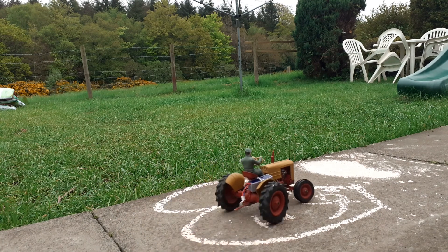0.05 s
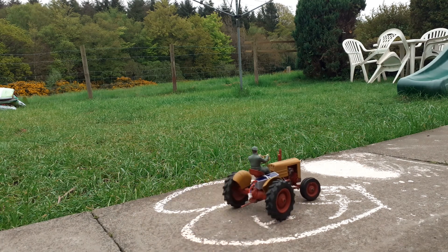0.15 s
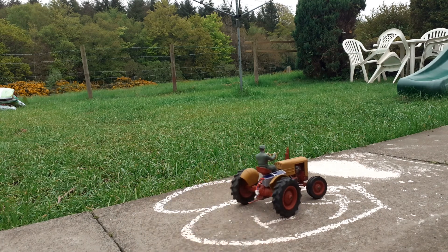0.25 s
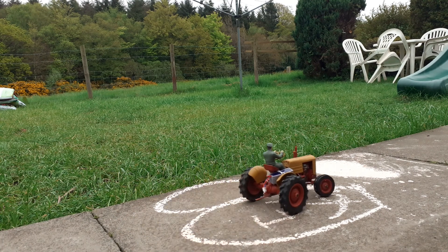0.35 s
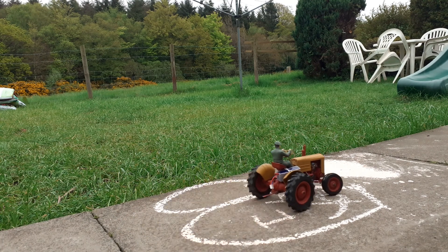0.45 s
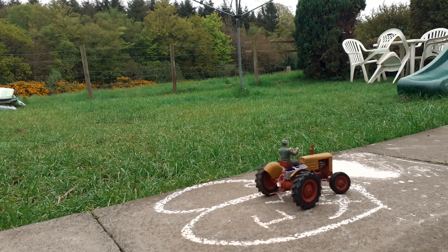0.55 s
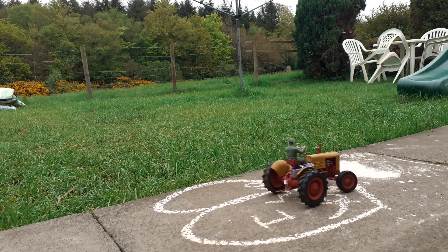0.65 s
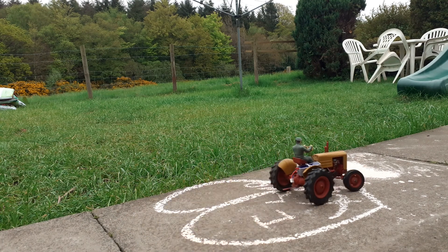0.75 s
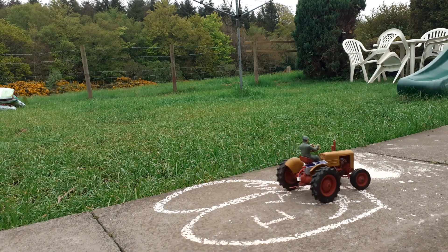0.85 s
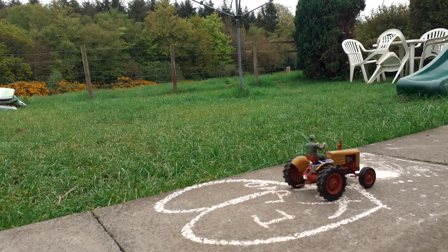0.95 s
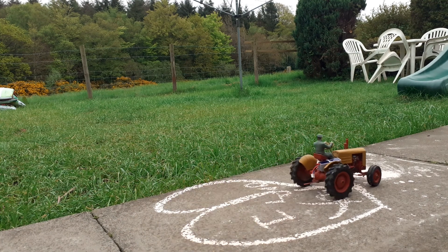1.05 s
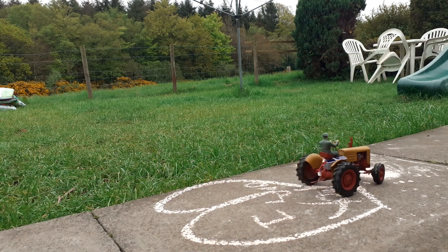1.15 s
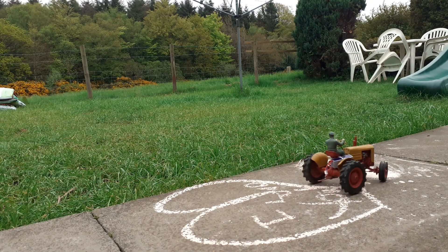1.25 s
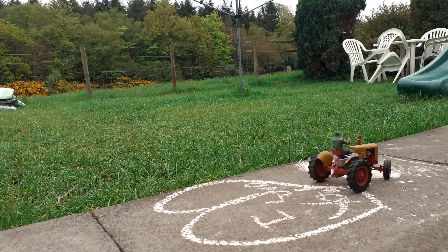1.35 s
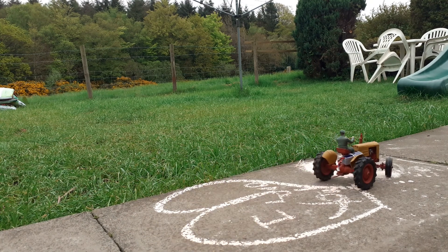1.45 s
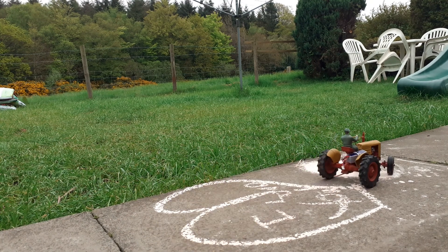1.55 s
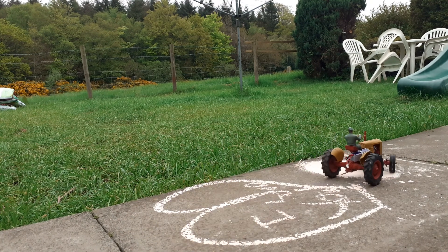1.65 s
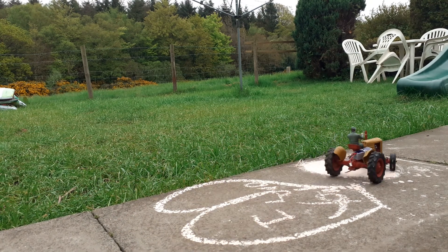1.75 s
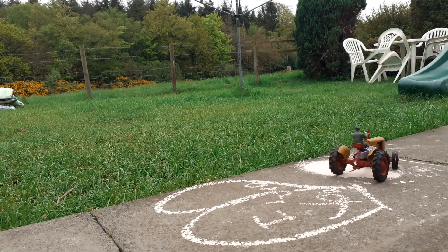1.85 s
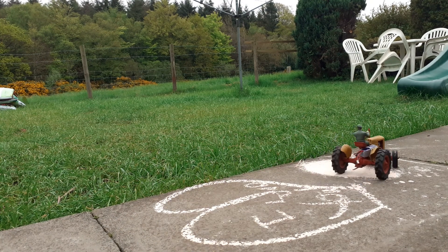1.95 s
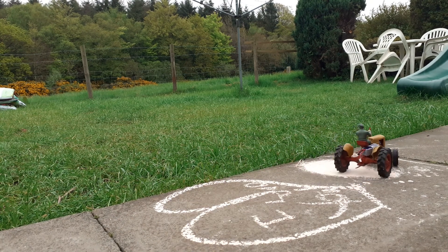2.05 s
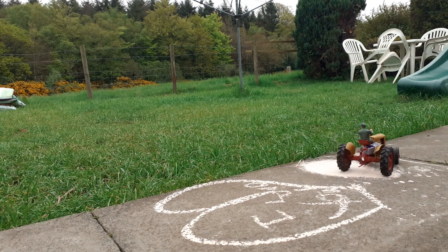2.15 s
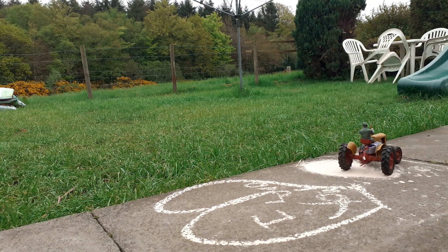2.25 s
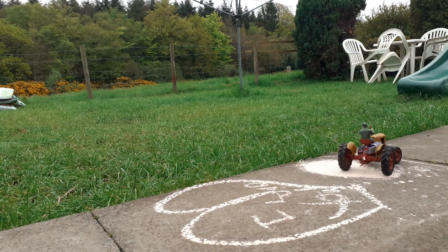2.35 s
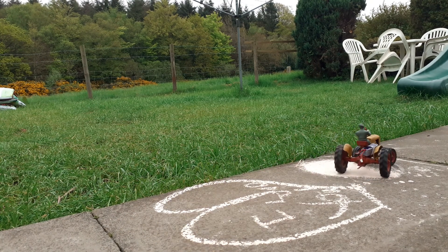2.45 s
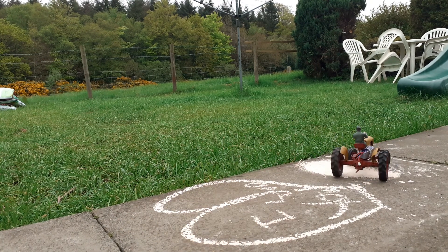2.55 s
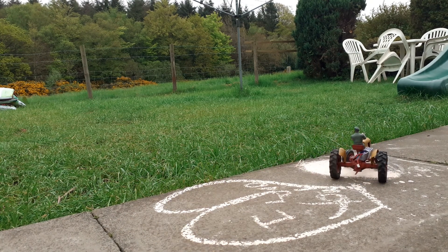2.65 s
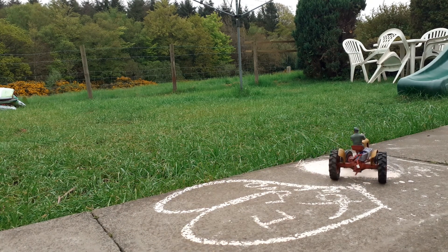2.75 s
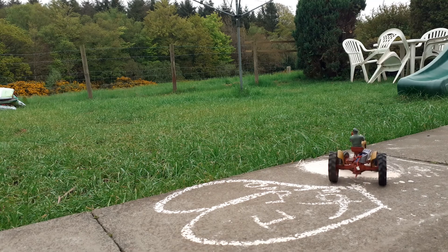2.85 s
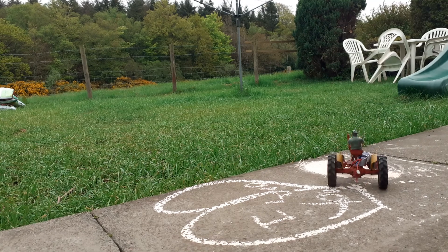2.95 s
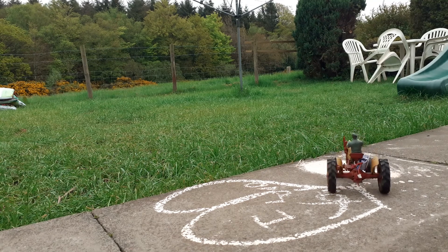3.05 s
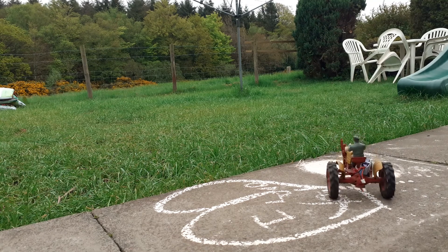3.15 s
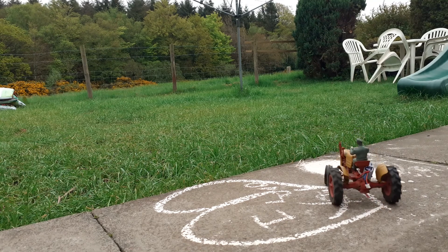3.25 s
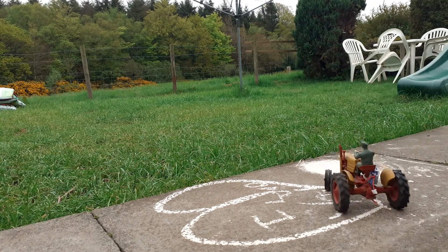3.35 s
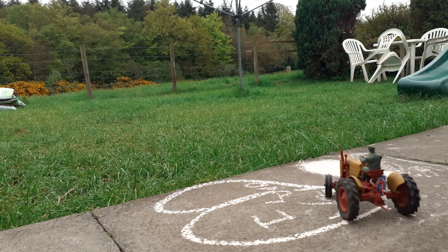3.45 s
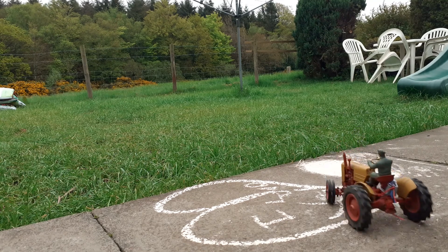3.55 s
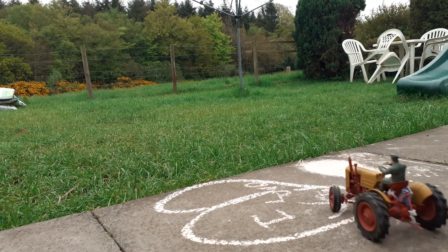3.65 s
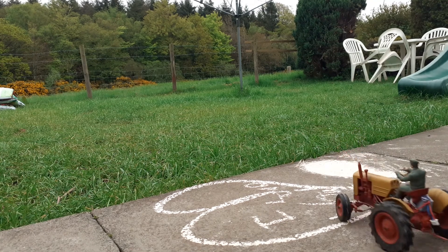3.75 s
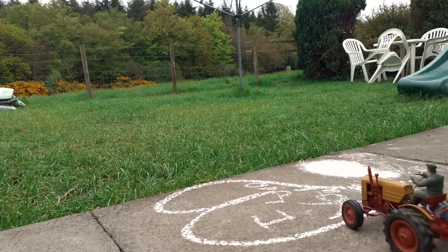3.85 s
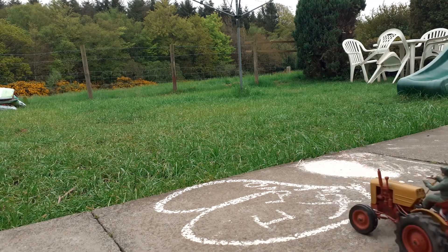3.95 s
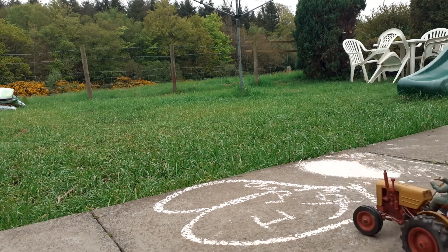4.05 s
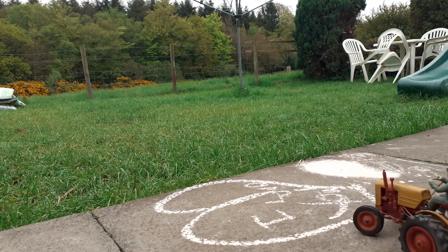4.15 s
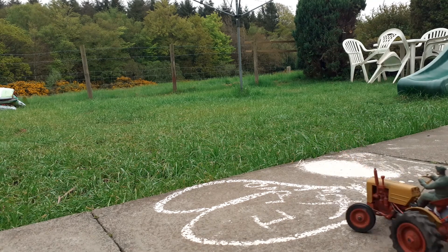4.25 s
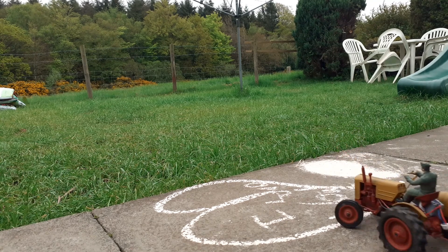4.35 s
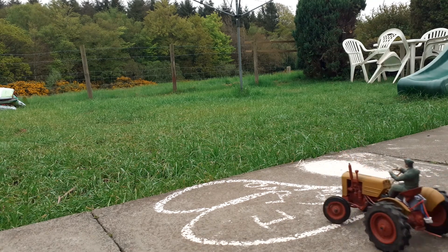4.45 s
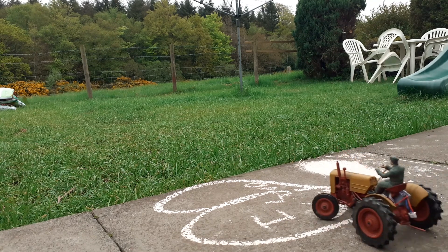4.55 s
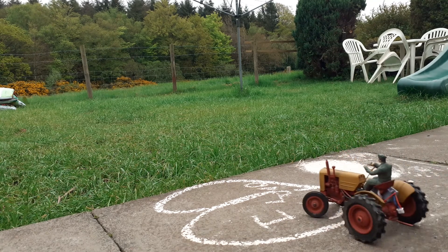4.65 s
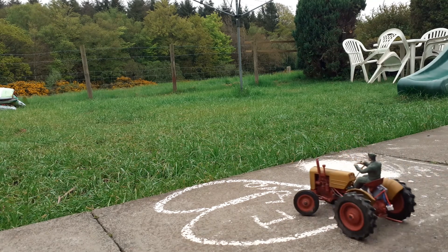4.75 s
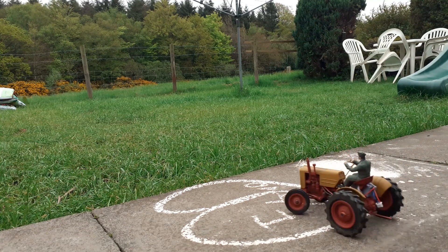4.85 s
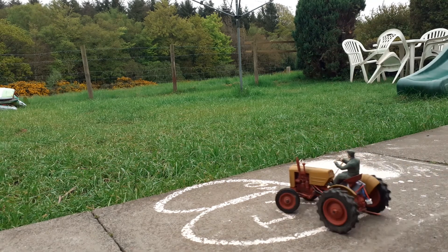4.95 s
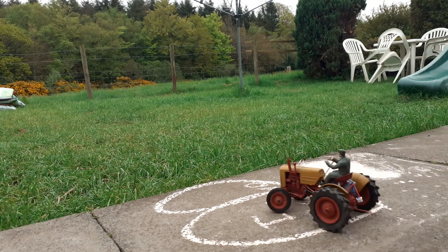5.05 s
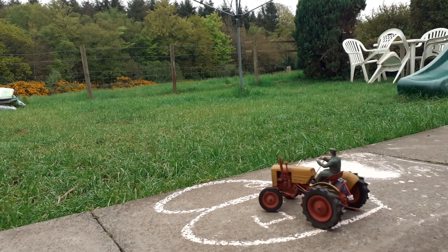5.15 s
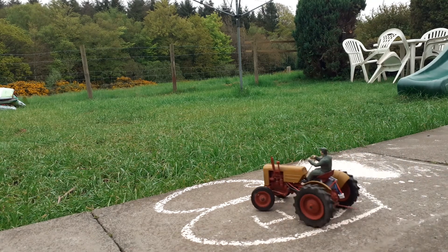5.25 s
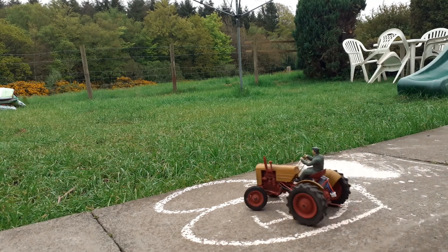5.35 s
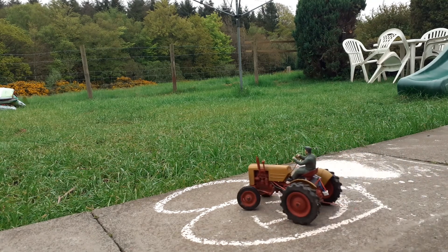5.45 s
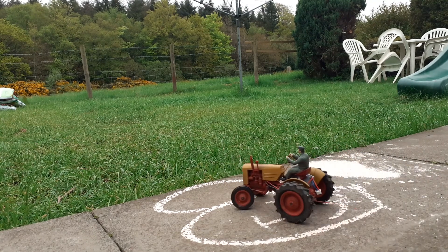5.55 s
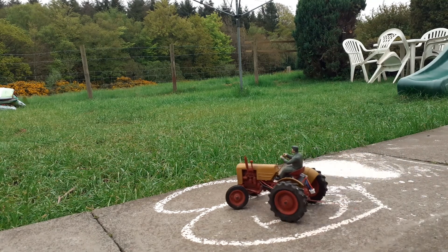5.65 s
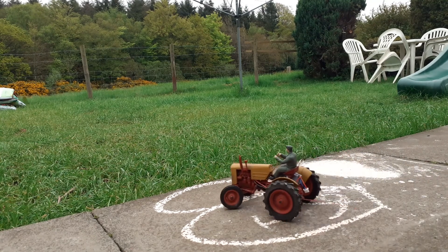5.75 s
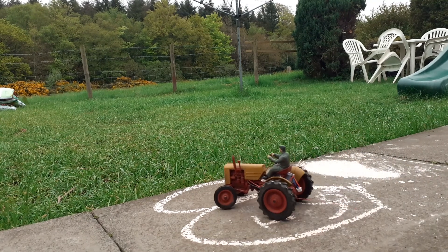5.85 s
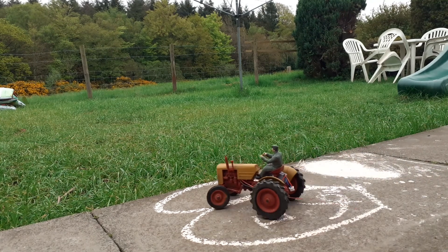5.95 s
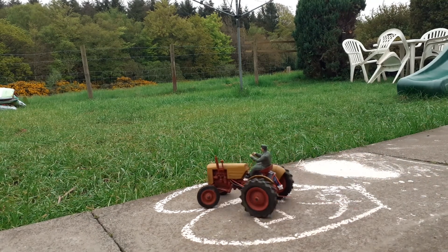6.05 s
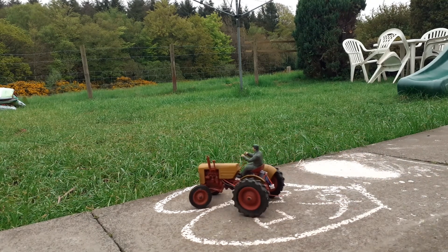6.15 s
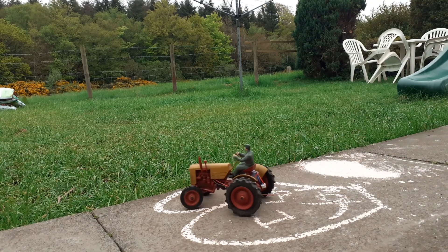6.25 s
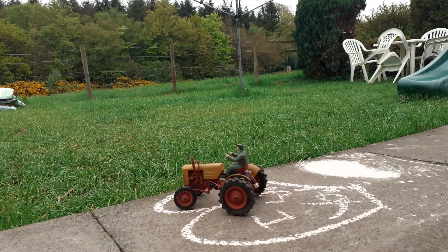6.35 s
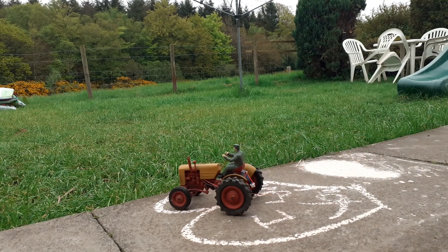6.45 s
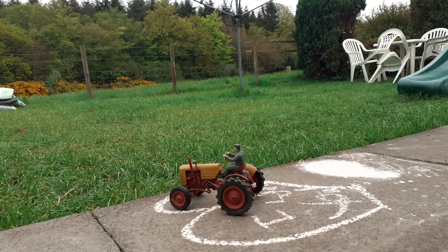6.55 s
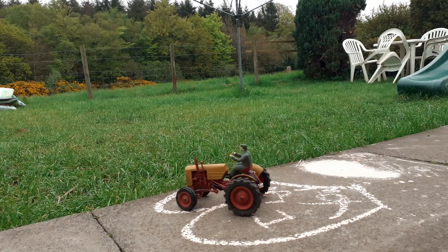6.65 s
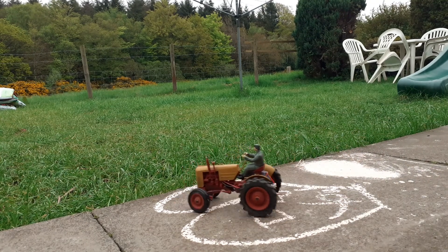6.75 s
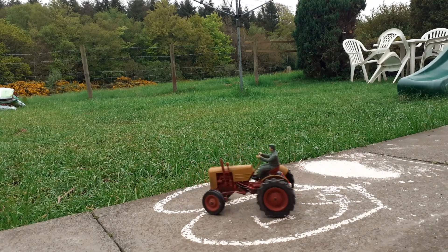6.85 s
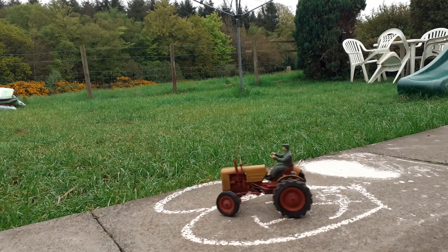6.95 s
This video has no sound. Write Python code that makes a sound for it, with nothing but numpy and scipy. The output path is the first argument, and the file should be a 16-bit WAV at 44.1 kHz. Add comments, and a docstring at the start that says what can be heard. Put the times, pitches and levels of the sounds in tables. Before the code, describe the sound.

A model tractor's electric motor and plastic gears whine steadily at close range on a garden patio. The drive cuts out, jerks briefly, then reverses with a harsher rasp and piercing little squeals. After a short lull it pulls forward, tyres crackling on grit, stops for quick steering whirs and gives one last rasping burst. Stereo microphones about a metre away, dry and open, with faint low rumble growing at the end.

```python
"""A patio: a radio-controlled model tractor drives over it, backs round in a turn and drives off towards the lawn.
Its plastic gears whine and rasp from the buzz and slide of teeth, filtered differently forwards and in reverse.
The motor sings in faint tones, steering whirs slide in pitch, and the tyres crunch grit in noise and clicks.
Filtered noise and wavering tones make a low outdoor rumble that swells towards the end."""
import sys
import numpy as np
from scipy import signal
from scipy.fft import rfft, irfft
from scipy.io import wavfile
from scipy.ndimage import uniform_filter1d, map_coordinates

SR = 44100
rng = np.random.default_rng(int(sys.argv[2]) if len(sys.argv) > 2 else 0)


def persist_wave(psi):
    """Save psi, clipped to +-1, as 16-bit WAV."""
    counts = np.round(np.clip(psi, -1, 1) * 32767).astype(np.int16)
    wavfile.write(sys.argv[1], SR, np.atleast_2d(counts).T)


N = 309141
TIME = np.arange(N) / SR
CRUISE_HZ = 1000  # reference rate of teeth meeting

# the tractor's path: (time [s], lag of the left ear [ms], left minus right level [dB], distance [m])
PATH = [(0, -0.011, 2, 0.8), (.5, 0.061, -0.5, 0.98), (1.2, .1, 0, 1.02), (1.9, 0.16, -0.5, 1.37),
        (2.25, 0.16, -1.5, 1.33), (2.8, .13, 0, 1.34), (3.3, 0.14, 0, 0.87), (3.7, .18, 1, 0.85),
        (4.25, 0.17, -0.5, 0.46), (4.7, 0.16, 1, 0.94), (5.4, 0.084, 0.5, 1.33), (6, 0.05, 0, 1.08),
        (6.45, -0.05, 2, 1.26), (7, 0.045, -0.5, 1.03)]
# gear speed at full throttle, before the sway of the lugs: (time [s], teeth meeting [per s])
SPEED = [(0, 970), (.07, 1110), (.19, 1080), (.33, 1140), (.56, 1120), (.7, 1090), (.82, 1030), (.96, 1010),
         (1.06, 1130), (1.25, 1075), (1.38, 1095), (1.6, 1075), (1.85, 950), (2.1, 930), (2.4, 1080),
         (2.5, 1080), (2.8, 900), (2.96, 950), (3.05, 1040), (3.25, 990), (3.39, 1050), (3.47, 1010),
         (3.58, 1100), (3.8, 920), (4.24, 880), (4.43, 1120), (4.62, 980), (4.9, 1040), (5.72, 810),
         (5.98, 930), (6.25, 980), (6.6, 940), (7, 1010)]


def from_db(db):
    """Turn decibels into a gain."""
    return 10 ** (np.asarray(db) / 20)


def rms_one(x):
    """Scale a sound to an average (rms) level of 1."""
    return x / np.sqrt(np.mean(x ** 2) + 1e-20)


def in_time(rows):
    """Draw each column of a time table as a curve with a value at every sample."""
    s, *columns = np.transpose(rows)
    return [np.interp(TIME, s, column) for column in columns]


def drift(rate):
    """Smooth random wandering of spread 1 that changes about rate times a second."""
    r = np.exp(-40 * np.pi * rate / SR)
    # made at a twentieth of the sample rate; the first values let the filter settle
    noise = rng.standard_normal(N // 20 + 2002)
    slow = signal.lfilter([1], [1, -2 * r, r * r], noise)[2000:]
    return np.interp(np.arange(N) / 20, np.arange(len(slow)), rms_one(slow))


def bump(s, half):
    """A smooth swell of height 1 around a moment; half is the time to fall to about a third."""
    return np.exp(-np.minimum(((TIME - s) / half) ** 2, 20))


def colour(x, points, size=8192):
    """Filter by a (Hz, dB) curve that falls away beyond its ends, with no sound before its cause."""
    hz, db = np.transpose(points)
    octave = np.log2(np.maximum(np.arange(size // 2 + 1), 1) * SR / size)
    known = np.log2(hz)
    beyond = np.abs(octave - np.clip(octave, known[0], known[-1]))
    response_db = np.interp(octave, known, db) - 20 * np.minimum(beyond, 2)
    # folding the cepstrum gives the filter its minimum phase
    cepstrum = irfft(np.log(from_db(response_db)))
    cepstrum[1:size // 2] *= 2
    cepstrum[size // 2 + 1:] = 0
    impulse = irfft(np.exp(rfft(cepstrum)))
    return signal.oaconvolve(np.atleast_2d(x), impulse[None], axes=1)[:, :N]


def band(x, low_hz, high_hz):
    """Keep only the frequencies between two limits."""
    sos = signal.butter(4, [low_hz, min(high_hz, .48 * SR)], "band", fs=SR, output="sos")
    return signal.sosfilt(sos, x)


def evened(x, size=2205):
    """Hold the running level at 1, keeping the fast grain."""
    return x / np.sqrt(np.maximum(uniform_filter1d(x ** 2, size), 1e-12))


def sine(hz):
    """A tone of rms 1 that follows a pitch curve."""
    return np.sqrt(2) * np.sin(2 * np.pi * np.cumsum(hz * np.ones(N)) / SR)


def clicks(rows):
    """One single-sample click for each (time [s], level [dB])."""
    out = np.zeros(N)
    for s, db in rows:
        out[int(s * SR)] += from_db(db)
    return out


def stereo_noise(width):
    """White noise of rms 1; width is the part that differs between the ears."""
    mid, side = rng.standard_normal((2, N))
    return rms_one(mid + width * side * np.array([[1], [-1]]))


def glides(rows, rough, hiss):
    """Rough tones that swell, slide in pitch and fade, each letting some hiss through."""
    out = np.zeros((2, N))
    for start, length, from_hz, to_hz, db in rows:
        progress = np.clip((TIME - start) / length, 0, 1)
        hz = (from_hz + (to_hz - from_hz) * progress) * (1 + rough * drift(294.0))
        out += from_db(db) * np.sin(np.pi * progress) * (sine(hz) + hiss)
    return out


def outdoor_noise(spectrum, width):
    """Coloured stereo noise of rms 1."""
    return rms_one(colour(stereo_noise(width), spectrum))


def rumble(deep_db=0.5, drone_db=0.0, upper_db=1.0, left_db=1.5):
    """Low air movement and far-off engine noise: three bands of noise and two wavering tones."""
    # far-off engine noise: (time [s], drone level [dB], upper rumble level [dB])
    engine_levels = [(0.0, -78, -71.5), (2.58, -81, -70), (3.73, -66, -60.5), (3.98, -80, -67.5),
                     (4.53, -73, -65), (4.72, -69.5, -64.5), (5.74, -68.5, -64), (6.68, -45.5, -54.5),
                     (7.01, -51.5, -61.5)]
    # puffs of air on the microphone: (time of peak [s], half length [s], level [dB])
    gusts = [(3.663, 0.3, -72), (4.467, .07, -57), (4.725, 0.092, -58.5), (5.185, 0.2, -64.5),
             (5.55, 0.21, -69), (6.204, 0.31, -62), (6.682, 0.17, -56), (6.95, .15, -60)]
    # spectra of the moving air, the drone and the upper rumble: (frequency [Hz], level [dB])
    deep_colour = [(20, -56), (33, -19), (45, -7.5), (75, -3), (100, -14), (160, -39)]
    drone_colour = [(60, -17), (88, -11), (104, 4), (116, -7), (128, 6), (150, -6.5), (190, -18),
                    (300, -38)]
    upper_colour = [(120, -11), (180, -5.5), (260, 1.5), (330, -3.5), (420, -9), (600, -14.5),
                    (1200, -15.5)]
    # wavering tones: (frequency [Hz], level against the drone [dB])
    wavering_tones = [(440, -17.5), (646, -19)]
    still_air_db = -81
    drone, upper = from_db(in_time(engine_levels))
    deep = from_db(still_air_db) + sum(from_db(db) * bump(s, half) for s, half, db in gusts)
    tones = sum(from_db(db + 2.0 * drift(29)) * sine(hz * (1 + 0.01414 * drift(10.6)))
                for hz, db in wavering_tones)
    out = from_db(deep_db) * deep * outdoor_noise(deep_colour, width=0.37)
    out += from_db(drone_db) * drone * (outdoor_noise(drone_colour, width=0.028) + tones)
    out += from_db(upper_db) * upper * outdoor_noise(upper_colour, width=0.42)
    return out * from_db([[left_db], [-left_db]])


def servo(hiss_db=3.0, overtone_db=-2.5):
    """Short sliding whirs, with an overtone a fifth above, as the front wheels are steered."""
    # whirs: (start [s], length [s], start pitch [Hz], end pitch [Hz], level [dB])
    whirs = [(2.094, 0.043, 8000, 7200, -58), (2.132, 0.076, 7340, 7230, -57),
             (2.191, 0.12, 7310, 6500, -58.5), (6.33, 0.065, 7900, 8500, -51.5),
             (6.38, 0.056, 9030, 8200, -53.5), (6.383, 0.053, 5980, 5660, -65),
             (6.417, 0.064, 8170, 7260, -50.5), (6.462, 0.16, 7100, 6420, -58)]
    hiss = from_db(hiss_db) * rms_one(band(stereo_noise(0.6), 5200, 14600))
    overtones = [(s, length, from_hz * 3 / 2, to_hz * 3 / 2, db + overtone_db)
                 for s, length, from_hz, to_hz, db in whirs]
    return glides(whirs, rough=.025, hiss=hiss) + glides(overtones, rough=.02, hiss=0)


def small_cracks():
    """Lesser grains give way at random, in clumps, on the gritty stretch."""
    from_s, to_s, cracks_per_s = 4.2, 6.3, 90
    crack_db = 11.5  # against the rolling noise
    born = rng.random(N) < cracks_per_s * from_db(5 * drift(20)) / SR
    born = born & (TIME > from_s) & (TIME < to_s)
    return born * from_db(crack_db + rng.uniform(-6, 4, N)) * rng.choice([-1, 1], N)


def splintered(rows, count=3):
    """Each (time [s], level [dB]) snap, with weaker splinters breaking away just before and after."""
    spread_s, splinter_db = .005, -11
    offsets = spread_s * rng.standard_normal((len(rows), count))
    splinters = [(s + offset, db + splinter_db)
                 for (s, db), around in zip(rows, offsets) for offset in around]
    return clicks(rows) + clicks(splinters)


def tyres(grains_per_s=700, size_db=2.5, scrub=1.0, width=1.0, level_db=2.0):
    """Treads scrub and crush fine grit; a large grain cracks with a tick and crumbles for a moment."""
    # rolling on the slabs, before level_db: (time [s], level [dB])
    rolling_levels = [(0.0, -70), (0.1, -67), (1.27, -70.5), (2.3, -81), (2.44, -62.5), (2.58, -74.5),
                      (3.08, -62), (3.42, -66), (3.73, -56.5), (3.86, -67.5), (4.2, -66), (4.22, -57.5),
                      (4.53, -54), (4.8, -58.5), (5.7, -67), (7.01, -53.5)]
    # colour of the rolling: (frequency [Hz], level [dB])
    rolling_colour = [(200, -10), (400, 3), (750, 4), (1050, 5), (1500, 0), (2100, 1), (2600, -2),
                      (3800, -9), (6000, -3), (12000, -14)]
    # larger grains cracking under the treads: (time [s], snap level [dB], tick against the snap [dB])
    large_grains = [(4.209, -45, 8), (4.237, -43, 10), (4.265, -43, 0), (4.31, -42, 0), (4.38, -41, 0),
                    (4.431, -40, 8), (4.451, -35, 6), (4.485, -36, 1), (4.514, -39, 0), (4.53, -39, 0),
                    (4.563, -41, 0), (4.59, -35, -4), (4.612, -38, -4), (4.657, -43, 0), (4.675, -42, -2),
                    (4.697, -35, 0), (4.849, -44, 0), (4.926, -45, 0), (4.965, -42, -2), (4.984, -44, 0),
                    (5.078, -36, 11), (5.106, -43, 0), (5.132, -45, 0), (5.258, -41, -3), (5.295, -46, -2),
                    (5.459, -48, 2), (5.467, -44, -2), (5.496, -44, -3), (5.662, -42, -2), (5.669, -40, 6),
                    (5.676, -46, 13), (5.887, -45, 0), (5.908, -45, 0), (5.928, -46, 5), (5.955, -45, 5),
                    (5.996, -46, 6), (6.089, -41, -3), (6.097, -43, 9), (6.103, -42, 8), (6.136, -42, 9),
                    (6.217, -41, -3)]
    # colours of a crack's body and of its tick: (frequency [Hz], level [dB])
    body_colour = [(200, -5), (600, 3.5), (1000, 8), (1400, 8.5), (2000, 11), (2800, 8), (4000, 6.5),
                   (5500, 3), (8000, -11), (15000, -24)]
    tick_colour = [(2500, -8), (4000, 2), (5500, 5), (7000, -4), (15000, -6)]
    body_db, tick_db = 14.5, 8.5  # gains of the body and the tick
    crumble, crumble_s = .04, .005  # strength against the snap, and time to die away
    rolling_db = in_time(rolling_levels)[0]
    born = rng.random(N) < grains_per_s * from_db(4 * drift(30)) / SR
    grain_db = size_db * np.minimum(rng.exponential(1, N), 4)
    grit = born * from_db(grain_db) * rng.choice([-1, 1], N)
    rolling = evened(colour(rms_one(grit) + scrub * stereo_noise(width), rolling_colour))
    small = from_db(rolling_db) * small_cracks()
    snaps = splintered([(s, db) for s, db, _ in large_grains]) + small
    ticks = splintered([(s, db + bright_db) for s, db, bright_db in large_grains]) + small
    crumbling = signal.lfilter([crumble], [1, -np.exp(-1 / (crumble_s * SR))], snaps + 1e-18)
    cracks = snaps + crumbling * stereo_noise(width)
    out = from_db(rolling_db + level_db) * rolling
    out = out + from_db(body_db) * colour(cracks, body_colour)
    return out + from_db(tick_db) * colour(ticks, tick_colour)


def drive():
    """The throttle opens and closes; gives its opening and the gears' level, reverse share, rasp and lean."""
    # presses of the throttle: (start [s], stop [s], time to take up load [s], gear level [dB],
    # share of load on the reverse flanks [0-1], extra rasp [dB], rasp raised left and lowered right [dB])
    presses = [(-.3, 2.17, .11, -2, 0, 0, -0.5), (2.325, 2.51, .085, 3, .5, 3, 0),
               (2.57, 2.603, .025, 0, .15, -2, -0.5), (2.76, 3.82, .085, 4, 0.39, 3, -2.5),
               (3.73, 4.08, 0.17, -5, 0.33, 2.5, -1.5), (4.086, 5, 0.14, -4.5, 0, 3.5, -3.5),
               (4.56, 6.3, 0.074, 0.5, 0.09, -1.5, -0.5), (6.26, 6.44, .05, -4.5, .15, 0, 0),
               (6.57, 6.96, 0.087, 2, 0.47, 7, 0.5)]
    # the teeth lose their load for a moment: (time [s], half length [s], dip [dB])
    slacks = [(0.048, 0.018, -2.5), (1.284, 0.027, -1), (1.497, 0.038, -2.5), (2.452, 0.0064, -9),
              (2.942, .006, -3), (3.02, .006, -5), (3.1, .006, -6), (3.195, .018, -3), (3.274, .008, -6),
              (3.49, .015, -4.5), (3.54, .0074, -9.5), (3.703, .0092, -8.5), (4.606, 0.022, -5.5),
              (4.7, .06, -3.5), (5.48, .04, -0.5), (6.916, .014, -8)]
    run_down_s, idle_db = .027, -8  # the drive runs down and ticks over between presses
    start, stop, take_up_s, level_db, *columns = np.transpose(presses)[:, :, None]
    taken_up = np.clip((np.minimum(TIME, stop) - start) / take_up_s, 0, 1)
    held = taken_up * np.exp(-np.clip((TIME - stop) / run_down_s, 0, 20))
    throttle = np.minimum(held.sum(0), 1)
    share = held / held.sum(0)
    power = np.sum((held * from_db(level_db)) ** 2, 0) + from_db(idle_db) ** 2
    slack_db = sum(db * bump(s, half) for s, half, db in slacks)
    gear_db = 10 * np.log10(power) + slack_db
    return throttle, gear_db, *(np.sum(share * column, 0) for column in columns)


def motor(throttle, waver=0.0193, flicker_db=1.5):
    """Current chopped at a steady pitch sings; the turning armature adds a tone above and one below."""
    # the armature cruises, stops and spins up again:
    # (time [s], commutation rate [Hz], upper tone level [dB], lower tone level [dB])
    armature = [(0, 232, -73, -76), (.45, 255, -73, -74), (.85, 218, -77, -75), (1.2, 235, -79, -73),
                (1.55, 225, -78, -79), (1.8, 210, -72.5, -79), (2.12, 195, -73.5, -80),
                (2.17, 150, -95, -98), (2.265, 25, -95, -98), (2.29, 50, -68, -76), (2.37, 190, -68, -76),
                (2.45, 330, -85, -95), (2.74, 60, -98, -98), (2.77, 110, -67, -76), (2.81, 235, -68, -80),
                (2.91, 395, -62, -80), (3, 435, -73, -80), (3.55, 490, -72, -82), (3.8, 350, -80, -90),
                (4.07, 30, -95, -98), (4.1, 70, -68, -76), (4.17, 155, -67, -76), (4.3, 200, -76, -85),
                (5.3, 200, -74, -85), (5.5, 160, -72, -82), (5.7, 141, -68.5, -80), (6, 195, -69, -82),
                (6.27, 239, -68, -82), (6.4, 180, -90, -98)]
    # switching tones of the speed controller at 1 m: (frequency [Hz], level [dB])
    switching_tones = [(1450, -77), (2900, -80)]
    # short swells of the chopping tone around three of the motor's starts:
    # (time of peak [s], half length [s], level [dB])
    chop_swells = [(2.31, .035, -72), (2.85, .08, -68), (4.12, .035, -72)]
    # drone of the rolling body: (time [s], level [dB])
    body_levels = [(0, -76), (.35, -67.5), (.8, -73), (1.2, -82), (1.6, -70), (2.1, -79.5), (2.3, -80),
                   (7, -102)]
    body_hz = 166.6
    turn_hz, upper_db, lower_db = in_time(armature)
    turn_hz = turn_hz * (1 + waver * drift(56.7))
    chop_hz = switching_tones[0][0]
    song = sum(from_db(db + flicker_db * drift(5.4)) * sine(chop_hz + side * turn_hz)
               for side, db in ((1, upper_db), (-1, lower_db)))
    # the switching tones sound only while the controller feeds the drive
    switching = sum(from_db(db + 2.5 * drift(8)) * sine(tone_hz * (1 + .001 * drift(30)))
                    for tone_hz, db in switching_tones)
    switching = throttle / in_time(PATH)[2] * switching
    swells = sum(from_db(db) * bump(s, half) for s, half, db in chop_swells) * sine(chop_hz)
    body_gain = from_db(in_time(body_levels)[0] + 2 * drift(13.0))
    body = body_gain * sine(body_hz * (1 + 0.0524 * drift(48.5)))
    return song + swells + switching + body


def squeals(hiss_db=-26.0):
    """Binding teeth shriek briefly, with a weaker partner a fourth above."""
    # shrieks: (start [s], length [s], start pitch [Hz], end pitch [Hz], level [dB])
    shrieks = [(0.222, 0.054, 4160, 4750, -49.5), (.255, 0.033, 4570, 4200, -55),
               (0.189, 0.4, 3540, 3690, -60), (2.46, 0.041, 7120, 5290, -49),
               (2.94, 0.078, 5420, 5980, -40), (3.025, 0.066, 6470, 5980, -42),
               (3.217, 0.056, 5980, 5570, -39.5), (3.1, 0.044, 6400, 6080, -42.5),
               (3.155, .03, 6120, 5850, -45), (3.288, 0.052, 6230, 5860, -43),
               (3.371, 0.069, 6180, 6330, -44.5), (3.45, 0.04, 6000, 5650, -41.5),
               (3.6, 0.084, 6688, 5970, -35.5), (3.715, 0.041, 6390, 5690, -37),
               (4.27, .095, 4450, 5650, -46), (4.295, .075, 6100, 7200, -55),
               (4.362, .055, 4700, 6500, -46), (4.385, .06, 4800, 4500, -49),
               (4.435, .045, 5300, 6050, -50), (4.434, .05, 6700, 7500, -50),
               (4.487, .1, 5560, 5060, -47.5), (4.497, .07, 4100, 3870, -51),
               (4.607, 0.051, 4920, 4690, -49), (4.278, 0.17, 3630, 4170, -55),
               (6.64, 0.19, 4660, 5120, -53), (6.799, 0.16, 5200, 4740, -52), (6.75, 0.1, 6800, 6150, -45),
               (6.92, 0.065, 6330, 5750, -43.5)]
    partner_db = -11
    hiss = from_db(hiss_db) * rms_one(band(stereo_noise(0.37), 5800, 9500))
    partners = [(s, length, from_hz * 4 / 3, to_hz * 4 / 3, db + partner_db)
                for s, length, from_hz, to_hz, db in shrieks]
    return glides(shrieks, rough=.011, hiss=hiss) + glides(partners, rough=.01, hiss=0)


def mesh_rate(throttle):
    """Teeth meeting per second: slower off the throttle; tread lugs lift and drop the wheels in scallops."""
    idle_slowing = .18  # share of the speed lost off the throttle
    lugs_per_s, lug_sway = 10.5, .075  # lug rate at cruising speed, sway as a share of the speed
    hz = in_time(SPEED)[0] * (1 - idle_slowing * (1 - throttle))
    lugs = np.cumsum(lugs_per_s * hz / CRUISE_HZ * (1 + .3 * drift(5))) / SR
    return hz * (1 + lug_sway * (np.abs(np.sin(np.pi * lugs)) - 2 / np.pi))


def mesh_tone(mesh_hz):
    """The second harmonic of the meeting teeth: a rough tone that wavers with every lug."""
    # (time [s], level [dB])
    tone_levels = [(0, -66), (.23, -65), (.33, -72), (.6, -71), (.85, -76), (1.1, -69.5), (1.4, -68),
                   (1.65, -73), (2.1, -77), (4.2, -73), (5.4, -79), (6.3, -75)]
    gain = from_db(in_time(tone_levels)[0] + 2.5 * drift(25))
    return gain * sine(2 * mesh_hz * (1 + .014 * drift(30) + .02 * drift(250)))


def casing_song(sway):
    """Chattering teeth sing in strands that weave round one pitch and follow the sway of the gears."""
    # pitch of the forward whine, before the sway: (time [s], pitch [Hz])
    whine_pitch = [(0, 4950), (.11, 5280), (.16, 4950), (.21, 5330), (.28, 4700), (.42, 5070), (.5, 4830),
                   (.6, 5300), (.76, 5030), (.84, 5230), (.88, 4980), (1.04, 5300), (1.12, 5100),
                   (1.42, 5400), (1.7, 5050), (1.9, 5230), (2.1, 5080), (4.1, 5250), (4.22, 5050),
                   (4.38, 5200), (4.49, 5550), (4.56, 5200), (4.63, 5450), (4.71, 4800), (4.79, 5280),
                   (4.85, 5100), (4.95, 5270), (5.17, 4780), (5.3, 5150), (5.6, 4920), (5.9, 4900),
                   (6.3, 4960)]
    # one strand to each pair of wheels: (level [dB], wander [share of the pitch], flicker [dB])
    strands = [(0, .016, 3.5), (-3.5, .035, 5), (-5, .05, 5), (-8, .07, 5)]
    # focused when cruising, frayed when the gears surge or labour:
    # (time [s], share against the grind [ratio], spread of the strands [factor])
    focus = [(0, .9, 1), (.5, .9, 1), (.62, .45, 1.5), (.8, .8, 1), (1.3, 1, 1), (2.1, .9, 1),
             (4.25, .9, .7), (4.29, .25, 2), (4.47, .25, 2), (4.52, .7, 1), (4.6, .45, 1.5), (4.8, .7, 1),
             (5, .7, 1), (5.3, .45, 1.6), (5.75, .45, 1.6), (6, .8, 1.6), (6.3, .8, 1.6), (6.37, .2, 2)]
    hz = in_time(whine_pitch)[0] * np.sqrt(sway)
    share, spread = in_time(focus)
    weave = sum(from_db(db + flicker_db * drift(14))
                * sine(hz * (1 + spread * wander * drift(14) + .01 * drift(300)))
                for db, wander, flicker_db in strands)
    return share * rms_one(weave)


def tooth_contact(mesh_hz, throttle, reverse, flutter_db=6.5, bite=0.41, uneven_db=1.0, width=0.41,
                  count=18, order=6):
    """Teeth strike in a buzz of harmonics and slide with a rasp that pulses at the same rate."""
    # how much of the buzz survives at each pitch: (frequency [Hz], level [dB])
    tone_share = [(1100, -6), (2200, -1), (3200, -3), (4100, -1), (5000, 2), (6300, -2), (8200, -3),
                  (10000, -5), (15500, -10)]
    forward_db, reverse_db = -4, -15  # buzz under forward and full reverse load
    squeal_db, partner_db = -3.5, -3  # squeal in full reverse, and its partner two harmonics higher
    buzz_db = forward_db + (reverse_db - forward_db) * reverse
    # eccentric wheels sway the rate, play between the teeth jitters it
    phase = 2 * np.pi * np.cumsum(mesh_hz * (1 + .007 * drift(30) + .007 * drift(250))) / SR
    buzz = sum(np.cos(k * phase + rng.uniform(0, 2 * np.pi)) * from_db(flutter_db * drift(17.0))
               for k in range(1, count))
    buzz = colour(rms_one(buzz), tone_share)
    # under reverse load one harmonic locks on to the casing and squeals
    partner = from_db(partner_db) * rms_one(np.cos((order + 2) * phase))
    squeal = reverse ** 2 * (rms_one(np.cos(order * phase)) + partner)
    slide = rms_one(stereo_noise(width) * np.exp(bite * np.cos(phase)))
    strikes = throttle * (from_db(buzz_db) * buzz + from_db(squeal_db) * squeal)
    return (strikes + slide) * from_db(uneven_db * drift(170))


def gearbox(throttle, level_db, reverse, extra_rasp_db, rasp_left_db, whine_db=-50.0, rasp_db=-50.0,
            chassis_db=-62.5, shake_db=1.0):
    """The teeth ring the casing; reversing loads their other flanks and wakes other resonances."""
    # casing response forwards and in reverse, and chassis ring: (frequency [Hz], level [dB])
    forward_colour = [(2800, -31), (3550, -10.5), (4200, -8), (4650, -3.5), (5100, 0), (5700, -4.5),
                      (7200, -7), (9300, -15.5), (10400, -10), (11200, -5), (12000, -2.5), (13000, -5),
                      (14200, -10), (15500, -6)]
    reverse_colour = [(2800, -10.5), (4200, -1.5), (5200, -7), (5850, 8.5), (6350, 0.5), (7000, -3),
                      (8100, -5), (8700, -16), (9500, -26), (10700, -14), (12000, 0), (13300, -4),
                      (14400, 3.5), (15500, 4)]
    chassis_ring = [(900, -19.5), (1200, -14.5), (1750, -12), (2200, -9), (2500, -11), (2900, -12.5),
                    (3600, -17)]
    # play between the teeth snapping shut: (time [s], click level before the filter [dB])
    backlash = [(2.41, -27), (2.877, -27), (3.459, -23)]
    whine_rise_db, rasp_rise_db = 13, 18  # faster gears are louder: dB per octave of speed
    reverse = np.clip(reverse, 0, 1)
    mesh_hz = mesh_rate(throttle)
    octaves = np.log2(mesh_hz / CRUISE_HZ)
    contact = tooth_contact(mesh_hz, throttle, reverse)
    casing = (1 - reverse) * colour(contact, forward_colour) + reverse * colour(contact, reverse_colour)
    # the clear tones die as soon as the forward flanks lose their load
    forwards = throttle * np.clip(1 - 3 * reverse, 0, 1)
    song = forwards * casing_song(mesh_hz / in_time(SPEED)[0])
    grind = evened(band(casing, 1700, 8180))
    whine = from_db(whine_db + whine_rise_db * octaves) * evened(grind + song)
    rasp_gain = from_db(rasp_db + extra_rasp_db + rasp_rise_db * octaves)
    rasp = rasp_gain * evened(band(casing, 8250, 15100)) * from_db([rasp_left_db, -rasp_left_db])
    chassis = from_db(chassis_db + rasp_rise_db * octaves) * evened(colour(contact, chassis_ring))
    distance_m = in_time(PATH)[2]
    running = (whine + rasp + chassis) * from_db(level_db + shake_db * drift(27)) / distance_m
    return running + forwards * mesh_tone(mesh_hz) + band(clicks(backlash), 3510, 14500)


def shifting_echoes(x, t60_s, size):
    """Dense echoes made of decaying noise, each random pattern fading into the next."""
    hop = int(.3 * SR)  # a new pattern every 0.3 s
    fade = np.sin(np.pi * np.arange(2 * hop) / (2 * hop))
    out = np.zeros((2, N + 3 * hop + size))
    padded = np.pad(x, ((0, 0), (hop, 2 * hop)))
    for i in range(0, N + hop, hop):
        tails = rng.standard_normal((2, size)) * from_db(-60 * TIME[:size] / t60_s)
        tails /= np.sqrt(np.sum(tails ** 2, axis=1, keepdims=True))
        echoes = signal.fftconvolve(padded[:, i:i + 2 * hop] * fade, tails, axes=1)
        out[:, i:i + 2 * hop + size - 1] += echoes
    return out[:, hop:hop + N]


def at_microphones(x, size=2048):
    """Ears differ in time and level; wheels and slabs scatter treble, the house wall adds a faint tail."""
    # treble scattered close by: (frequency [Hz], level against the direct sound [dB])
    scatter_colour = [(1000, -16), (3500, -12), (6000, -8), (9000, -4), (15000, -3)]
    scatter_t60_s, garden_t60_s = .008, 0.038  # time for the echoes to fall by 60 dB
    garden_db = -12
    lag_ms, pan_db, _ = in_time(PATH)
    delay = lag_ms * SR / 1000 / 2  # samples: half the lag on each ear
    direct = np.array([map_coordinates(ear, [np.arange(N) - side * delay], order=5, mode="nearest")
                       for ear, side in zip(x, (1, -1))])
    near = colour(shifting_echoes(x, scatter_t60_s, size), scatter_colour)
    garden = from_db(garden_db) * shifting_echoes(x, garden_t60_s, size)
    return (direct + near + garden) * from_db([pan_db / 2, -pan_db / 2])


def scene(gears_db=-0.08):
    """The tractor on its path, in the open air."""
    throttle, level_db, reverse, extra_rasp_db, rasp_left_db = drive()
    gears = gearbox(throttle, level_db, reverse, extra_rasp_db, rasp_left_db) + squeals() + servo()
    tractor = from_db(gears_db) * gears + motor(throttle) + tyres()
    return at_microphones(tractor) + rumble()


def record(dry):
    """Cut the top steeply above 15.8 kHz."""
    return signal.sosfilt(signal.ellip(12, .1, 80, 15800, fs=SR, output="sos"), dry)


dry = scene()
out = record(dry)
persist_wave(out)
```